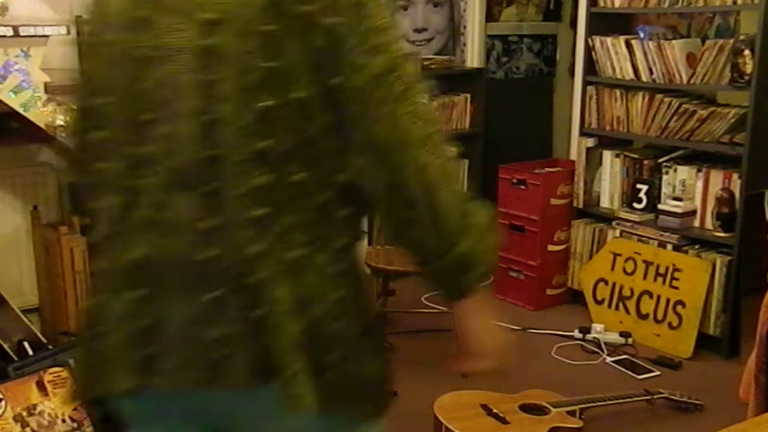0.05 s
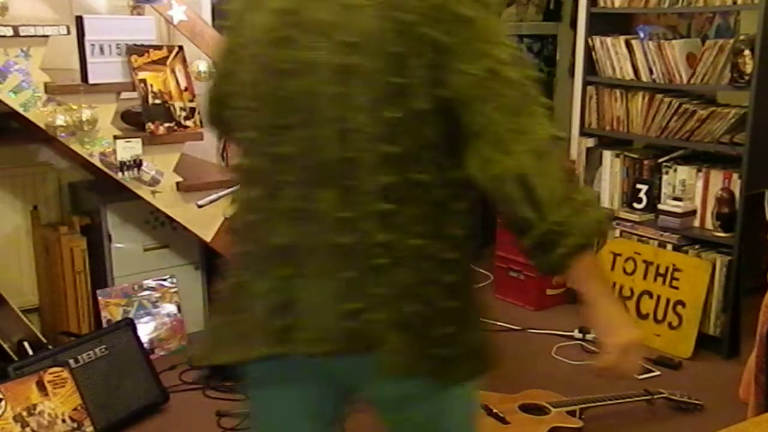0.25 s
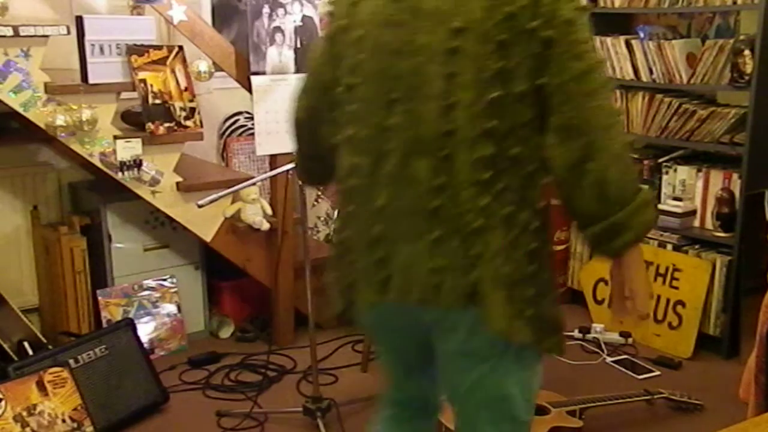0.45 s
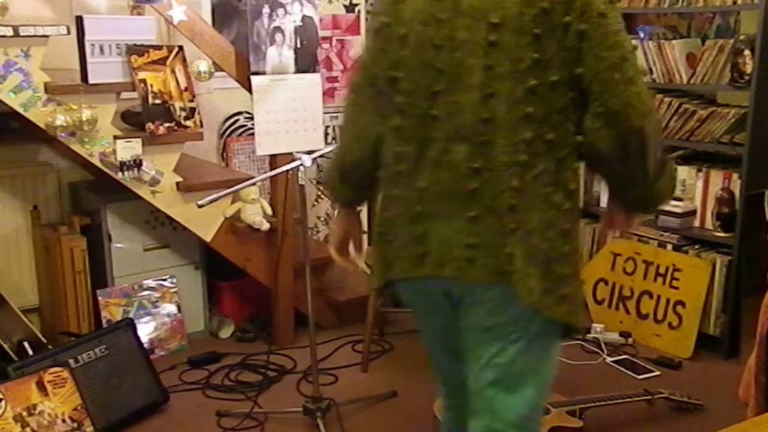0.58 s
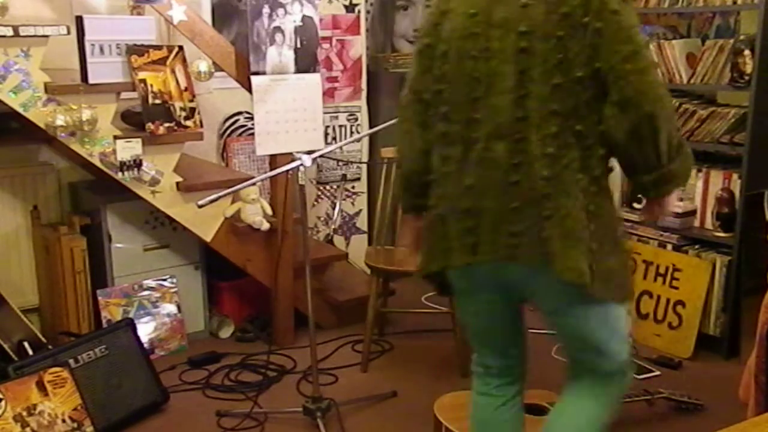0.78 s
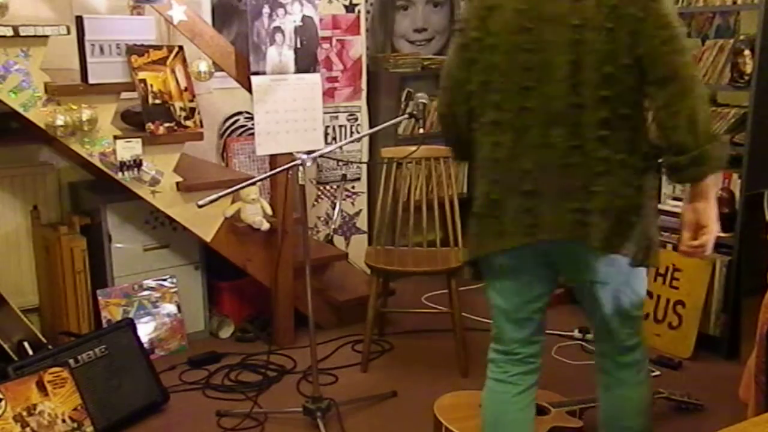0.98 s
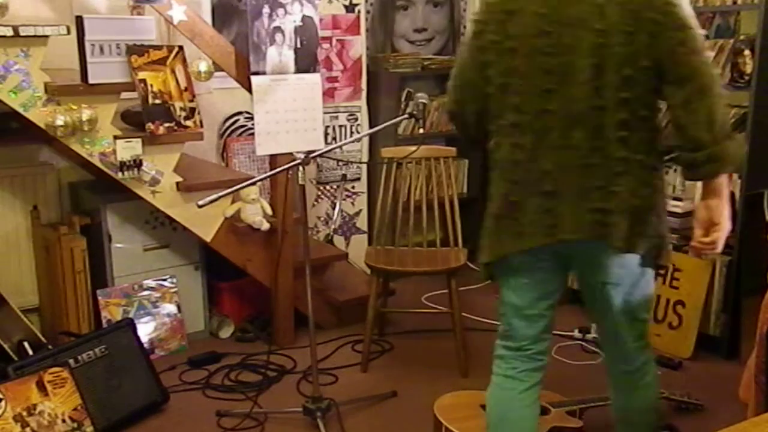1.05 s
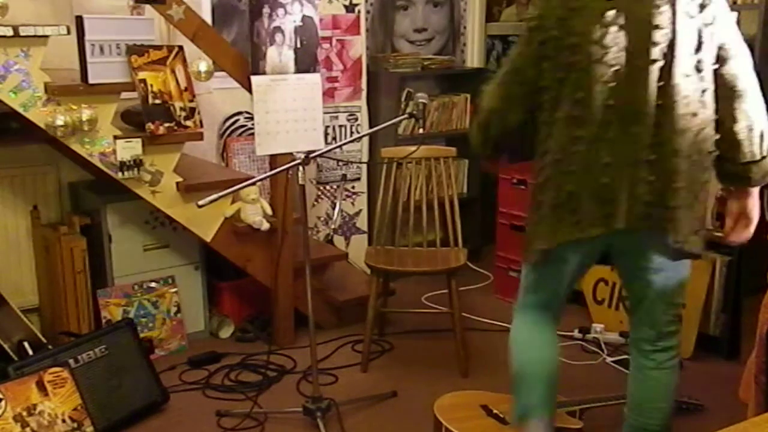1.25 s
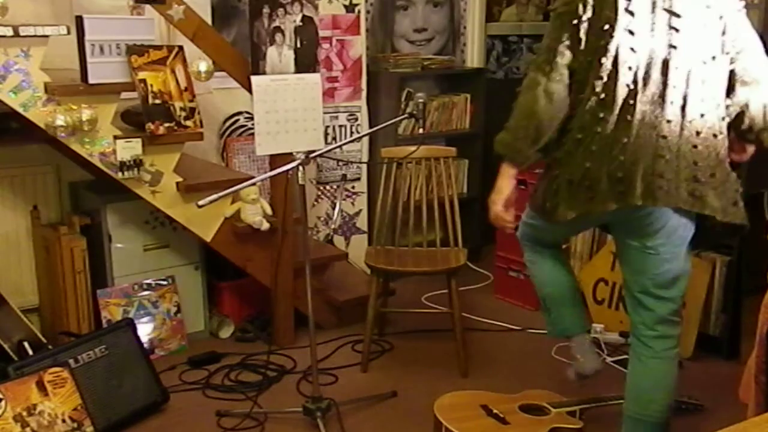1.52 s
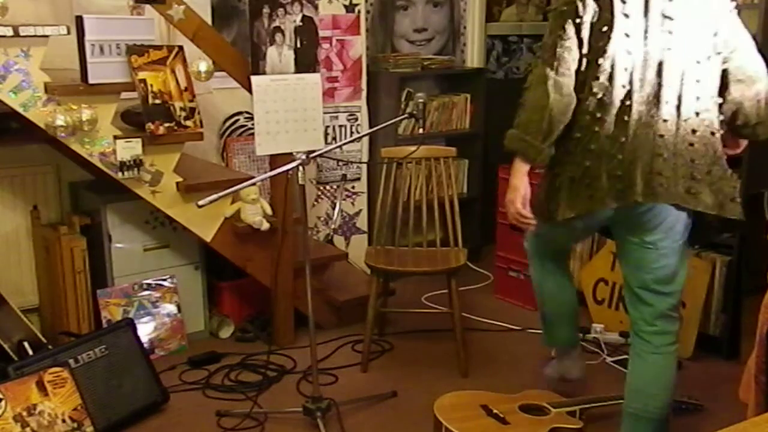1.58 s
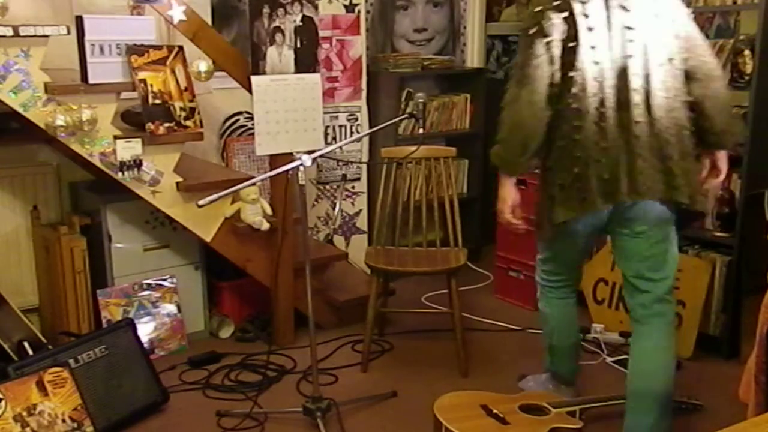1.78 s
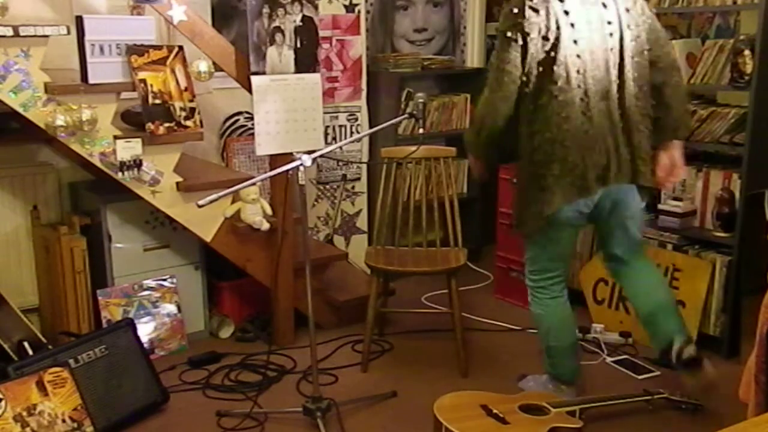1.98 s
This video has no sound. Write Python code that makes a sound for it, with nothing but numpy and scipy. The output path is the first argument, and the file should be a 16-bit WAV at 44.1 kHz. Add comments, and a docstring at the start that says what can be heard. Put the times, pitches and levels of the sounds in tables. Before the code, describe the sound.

Soft sock footsteps on carpet over hollow boards, in a small furnished room with faint hum and hiss. Four deep, muffled booms with dull knocks fall around 0.2, 0.65, 1.1 and 1.7 seconds. Clothes rustle lightly throughout, strongest near 1.4; soles scuff at 0.5, 0.67, 1.7 and 1.8, trousers rub around 1.2. A tiny, bright, hard tick comes at 1.97. Nearby microphone, same in both ears.

```python
"""Faint room hum, hiss and rustling clothes over a floor still swinging; then four soft sock steps on carpet.
Each step makes the wooden floor boom (swelling sine modes) and knock dully (coloured noise bursts).
Soles scuff the pile and trouser legs rub (grainy noise bursts); rustle is grainy noise on a level curve.
One small bright tick, a short ringing sine with echoes and a noise tail, comes at the end.
"""
import sys
import numpy as np
from scipy import signal
from scipy.fft import rfft, irfft
from scipy.io import wavfile
from scipy.ndimage import uniform_filter1d

SR = 44100
rng = np.random.default_rng(int(sys.argv[2]) if len(sys.argv) > 2 else 0)


def materialize(psi):
    """Save the field psi as 16-bit PCM at rate SR to the path in sys.argv[1].

    A 1-D psi becomes a single channel; in a 2-D psi each row is a channel.
    """
    bounded = np.clip(np.atleast_2d(psi).T, -1, 1)
    quanta = np.round(bounded * 32767).astype(np.int16)
    wavfile.write(sys.argv[1], SR, quanta)


N = 90404  # samples


def undb(db):
    """Decibels to gain."""
    return 10 ** (np.asarray(db) / 20)


def noise(colour, tilt_db_per_octave=0):
    """Noise of rms 1, shaped by a spectrum interpolated over octaves and optionally tilted."""
    hz, db = np.array(colour, float).T
    db = db + tilt_db_per_octave * np.log2(hz)
    octave = np.log2(np.maximum(np.fft.rfftfreq(N, 1 / SR), 1))
    gain = undb(np.interp(octave, np.log2(hz), db))
    shaped = irfft(rfft(rng.standard_normal(N)) * gain, N)
    return shaped / shaped.std()


def walk(rate_hz):
    """Smooth random curve of spread 1: white noise averaged twice over 1 / rate_hz."""
    size = max(int(SR / rate_hz), 1)
    once = uniform_filter1d(rng.standard_normal(N), size)
    twice = uniform_filter1d(once, size)
    return twice / twice.std()


def grainy(x, grain_db, grain_hz=580):
    """Fibres catch and slip: a fast random level flicker, rescaled to rms 1."""
    flickering = x * undb(grain_db * walk(grain_hz))
    return flickering / flickering.std()


def burst(age, attack_s, decay_s):
    """Envelope: straight rise to 1, then exponential fall."""
    rise = np.clip(age / attack_s, 0, 1)
    return rise * np.exp(-np.maximum(age - attack_s, 0) / decay_s)


def ring(age, hz, swell_s, shape):
    """Resonance: a sine whose envelope swells to 1 at swell_s and dies away."""
    u = np.maximum(age, 0) / swell_s
    envelope = (u * np.exp(1 - u)) ** shape
    return envelope * np.sin(2 * np.pi * hz * age)


# Spectrum of the room air. Each row: frequency in Hz, relative density in dB per Hz.
ROOM_COLOUR = [(20, 0), (45, 2), (80, -6), (150, -3.5), (250, -7.5), (450, -11.5), (800, -14), (1500, -22),
               (3000, -32.5), (8000, -66)]
# Spectrum of the microphone hiss. Each row: frequency in Hz, relative density in dB per Hz.
HISS_COLOUR = [(100, -8), (1500, 3), (4000, 0), (7000, 0), (10500, 2.5), (13000, -3), (14300, -4),
               (15500, -5.5)]
# Faint hum. Each row: frequency in Hz, rms level in dB.
HUM_TONES = [(200, -69), (301, -68)]


def background(t):
    """Steady low room air and hiss as coloured noise; hum as sines of wandering phase."""
    room_db, hiss_db = -52, -55
    hum = np.zeros(N)
    for hz, rms_db in HUM_TONES:
        phase = 2 * np.pi * hz * t + 0.36 * walk(5.3)  # wander in radians
        hum += undb(rms_db) * np.sqrt(2) * np.sin(phase)
    return hum + undb(room_db) * noise(ROOM_COLOUR) + undb(hiss_db) * noise(HISS_COLOUR)


# Floor still swinging from an earlier step. Single row: level in dB, frequency in Hz, decay in s.
EARLIER_SWING = (-41.5, 29, 0.17)


def floor_settling(t):
    """The floor's swing from an earlier step, a low sine dying exponentially from the start."""
    db, hz, decay_s = EARLIER_SWING
    return undb(db) * np.exp(-t / decay_s) * np.sin(2 * np.pi * hz * t)


# Level curve of the clothes' rustle. Each row: time in seconds, level in dB.
RUSTLE_LEVEL = [(0, -53.5), (.14, -54.5), (.2, -57), (.26, -52.5), (.35, -51.5), (.43, -57), (.56, -50.5),
                (.64, -55), (.74, -54.5), (.9, -60), (1.09, -57.5), (1.2, -52.5), (1.26, -54), (1.33, -48),
                (1.46, -48), (1.55, -52.5), (1.66, -57.5), (1.85, -53), (1.94, -59), (2.05, -57.5)]
# Spectrum of the cloth. Each row: frequency in Hz, relative density in dB per Hz.
CLOTH_COLOUR = [(150, -5.5), (400, 1), (900, 1.5), (1800, 1.5), (4000, 2), (8000, 3), (10500, 4),
                (13000, -1), (14200, -1), (15500, -19)]
CLOTH_GRAIN_DB = 1


def clothes_rustle(t):
    """Shirt and trousers rustle: fluttering noise, strongest as the knee lifts for the last step."""
    flutter_db = 0.5
    level_db = np.interp(t, *np.array(RUSTLE_LEVEL).T) + flutter_db * walk(35)
    return undb(level_db) * grainy(noise(CLOTH_COLOUR), CLOTH_GRAIN_DB)


# Weight landing on heel or ball, or shifting after the step. Each row: start in seconds, level in dB,
# floor pitch in Hz, swell in s, after-swing in dB relative to the level.
FLOOR_FOOTFALLS = [(0.188, -23, 33.7, 0.035, -22), (0.281, -26, 34.3, 0.033, -6.5),
                   (0.623, -22, 36.5, 0.049, -35), (1.06, -25.5, 40.7, 0.043, -23),
                   (1.144, -24.5, 42.4, 0.02, -27), (1.21, -43.5, 47.7, 0.045, -4),
                   (1.686, -25.5, 45.5, 0.019, -26), (1.739, -23.5, 43.5, .02, -15),
                   (1.826, -36, 45.6, 0.029, -13)]


def floor_booms(t):
    """The floor sinks under each footfall, booms in two bending modes and swings on slowly on its joists."""
    shape = 1.92  # higher = rounder swell, quicker end
    upper_ratio, upper_db = 1.683, -18.5
    sway_hz, sway_decay_s = 25.63, 0.19
    out = np.zeros(N)
    for start_s, db, hz, swell_s, sway_db in FLOOR_FOOTFALLS:
        age = t - start_s
        lower = ring(age, hz, swell_s, shape)
        upper = undb(upper_db) * ring(age, hz * upper_ratio, swell_s, shape)
        sway = burst(age, swell_s, sway_decay_s) * np.sin(2 * np.pi * sway_hz * age)
        out -= undb(db) * (lower + upper + undb(sway_db) * sway)  # minus: sinks first
    return out


# Dull board knocks. Each row: start in seconds, low thud in dB, woody body in dB, attack in s, decay in s.
BOARD_KNOCKS = [(0.238, -46.5, -52.5, 0.037, 0.023), (0.311, -38, -68, 0.023, 0.015),
                (.35, -55.5, -62, 0.018, 0.15), (.612, -45.5, -56, 0.018, 0.065),
                (0.666, -46.5, -47, 0.021, 0.058), (1.079, -45, -49.5, 0.016, 0.052),
                (1.134, -49, -58, 0.012, 0.084), (1.684, -36.5, -39.5, 0.022, 0.024),
                (1.735, -40.5, -68, .01, 0.051)]
# Spectrum of the low thud. Each row: frequency in Hz, relative density in dB per Hz.
THUD_COLOUR = [(30, -23), (65, 1), (110, 1), (150, -1.5), (220, -14.5), (400, -35), (1000, -72)]
# Spectrum of the woody body. Each row: frequency in Hz, relative density in dB per Hz.
BODY_COLOUR = [(100, -30), (200, -10), (260, 0.5), (330, -2.5), (440, 0), (620, -5.5), (900, -13),
               (1500, -32), (3000, -27), (8000, -50)]


def board_knocks(t):
    """Dense board and room resonances, muffled by the carpet, as bursts of low and woody noise."""
    out = np.zeros(N)
    for start_s, thud_db, body_db, attack_s, decay_s in BOARD_KNOCKS:
        thud = undb(thud_db) * noise(THUD_COLOUR)
        body = undb(body_db) * noise(BODY_COLOUR)
        out += burst(t - start_s, attack_s, decay_s) * (thud + body)
    return out


# Soles brushing the pile. Each row: start in seconds, level in dB, attack in s, decay in s,
# tilt in dB per octave.
SOLE_SCUFFS = [(0.489, -49, 0.015, 0.047, 0), (.657, -43.5, 0.017, 0.02, 2.5),
               (0.674, -48.5, 0.026, 0.042, -5.5), (1.688, -43.5, 0.0088, 0.023, -2.5),
               (1.807, -46, 0.008, 0.012, 3)]
# Spectrum of the scuffs before tilt. Each row: frequency in Hz, relative density in dB per Hz.
SCUFF_COLOUR = [(200, -17), (800, 3), (2000, 5.5), (4000, 2.5), (7000, 2.5), (10000, -4), (15000, -19.5)]


def sole_scuffs(t):
    """Socks brush the pile: short bursts of grainy noise, each tilted brighter or duller."""
    out = np.zeros(N)
    for start_s, db, attack_s, decay_s, tilt_db in SOLE_SCUFFS:
        brush = grainy(noise(SCUFF_COLOUR, tilt_db), grain_db=1)
        out += undb(db) * burst(t - start_s, attack_s, decay_s) * brush
    return out


# Trouser legs rubbing. Each row: start in seconds, level in dB, attack in s, decay in s.
TROUSER_RUBS = [(1.12, -53.5, .11, 0.087)]
# Spectrum of the rub. Each row: frequency in Hz, relative density in dB per Hz.
RUB_COLOUR = [(100, -6), (300, -7), (900, 0), (1600, -10.5), (4000, -10.5), (10000, -30)]


def trouser_rubs(t):
    """Trouser legs rub: grainy noise bursts, lower in pitch than the rustle."""
    out = np.zeros(N)
    for start_s, db, attack_s, decay_s in TROUSER_RUBS:
        rub = grainy(noise(RUB_COLOUR), CLOTH_GRAIN_DB)
        out += undb(db) * burst(t - start_s, attack_s, decay_s) * rub
    return out


# Reflections off nearby furniture. Each row: delay in seconds, level in dB relative to the click.
FURNITURE_ECHOES = [(.0045, -26), (.0085, -15), (0.0118, -5)]
# Spectrum of the tick's room tail. Each row: frequency in Hz, relative density in dB per Hz.
TAIL_COLOUR = [(5000, -40), (8000, -10), (9100, -2), (10200, 0), (11200, 1), (12500, -12), (15000, -24)]


def tick(t):
    """A small hard object ticks once: a brief high ring, its first reflections and a noise tail."""
    start_s, db, hz, swell_s = 1.97495, -24.5, 10250, 0.00048
    tail_db, tail_attack_s, tail_decay_s = -43, 0.00067, 0.02
    age = t - start_s

    def click(delay_s):
        return undb(db) * ring(age - delay_s, hz, swell_s, shape=4.4)

    echoes = sum(undb(echo_db) * click(delay_s) for delay_s, echo_db in FURNITURE_ECHOES)
    tail = undb(tail_db) * burst(age, tail_attack_s, tail_decay_s) * noise(TAIL_COLOUR)
    return click(0) + echoes + tail


def scene():
    """All sources summed at one point, the same in both ears."""
    t = np.arange(N) / SR
    sound = background(t) + floor_settling(t) + clothes_rustle(t)
    sound += floor_booms(t) + board_knocks(t) + sole_scuffs(t)
    sound += trouser_rubs(t) + tick(t)
    return np.array([sound, sound])


def record(dry):
    """The microphone port leaves a narrow dip in the treble; a steep low-pass cuts the top."""
    notch_hz, notch_width_hz, notch_db = 11740, 200, -10
    top_hz, ripple_db, stop_db = 15750, 0.1, 80
    hz = np.fft.rfftfreq(N, 1 / SR)
    port = undb(notch_db * np.exp(-((hz - notch_hz) / notch_width_hz) ** 2))
    dipped = irfft(rfft(dry) * port, N)
    top = signal.ellip(12, ripple_db, stop_db, top_hz, fs=SR, output="sos")
    return signal.sosfilt(top, dipped)


dry = scene()
out = record(dry)
materialize(out)
```